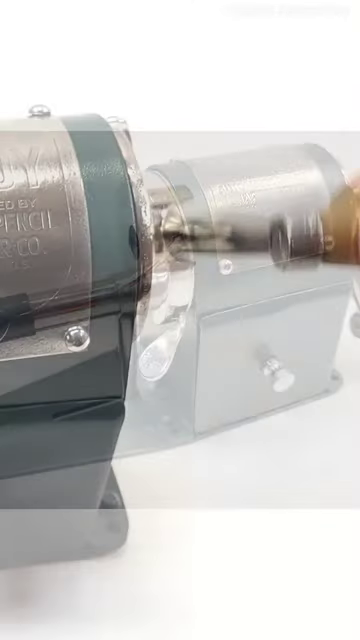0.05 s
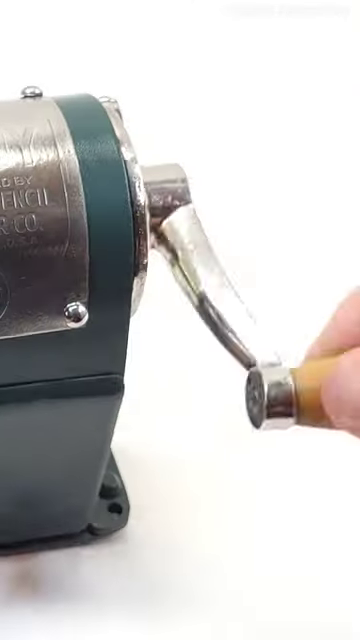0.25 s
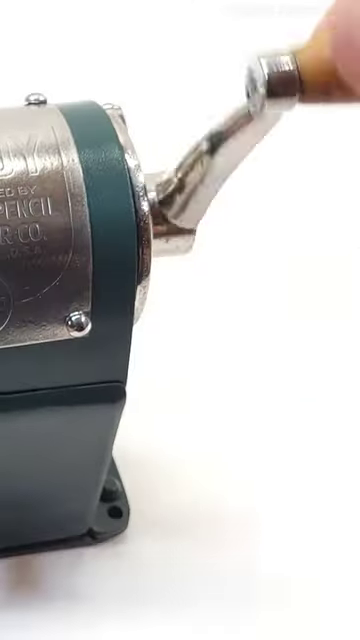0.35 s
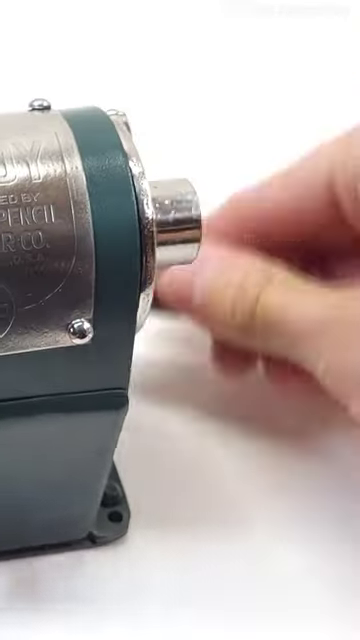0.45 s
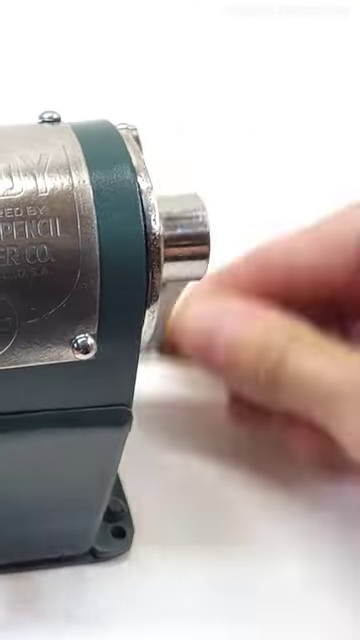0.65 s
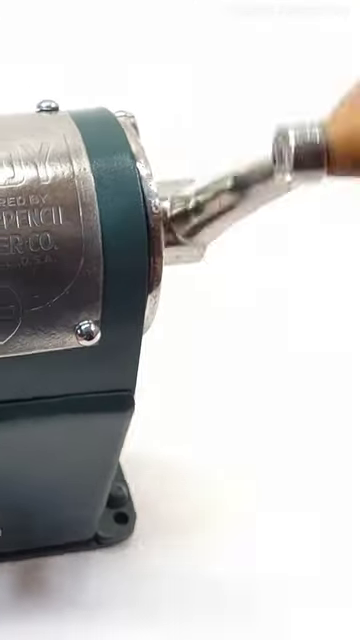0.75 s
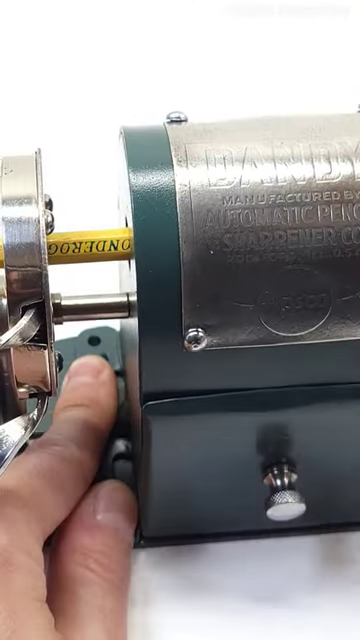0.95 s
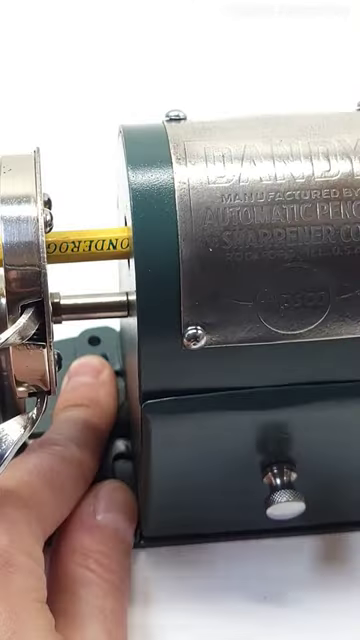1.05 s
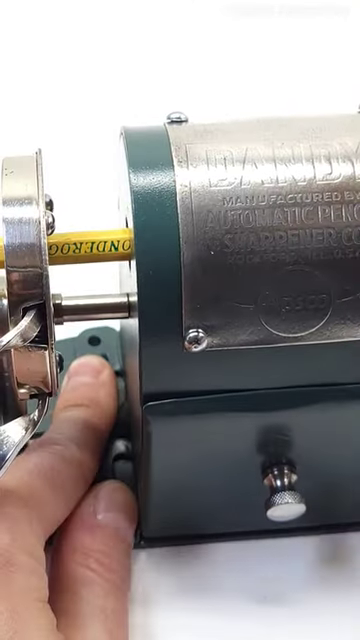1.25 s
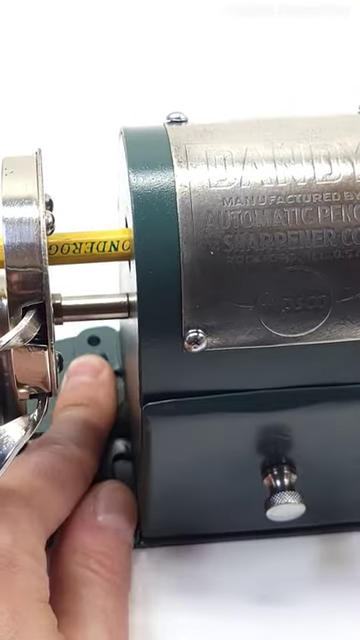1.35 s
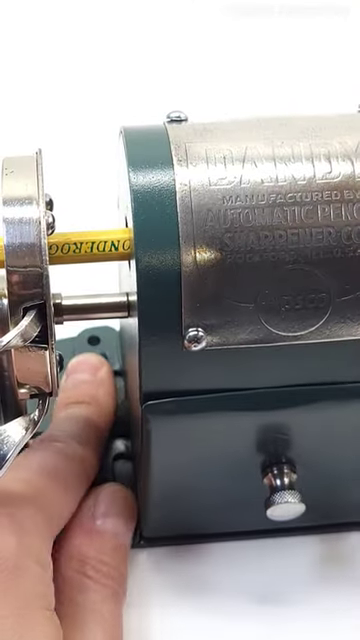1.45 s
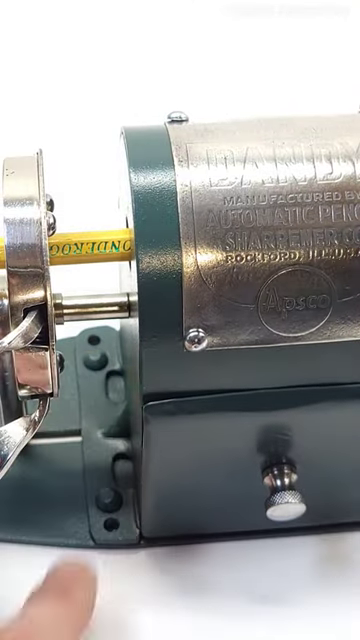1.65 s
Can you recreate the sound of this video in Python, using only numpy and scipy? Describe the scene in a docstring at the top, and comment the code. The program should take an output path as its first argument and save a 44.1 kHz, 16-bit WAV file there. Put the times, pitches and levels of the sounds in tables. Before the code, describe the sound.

A hand-cranked pencil sharpener starts lightly, then grinds steadily through wood with gear clicks and tiny squeaks while the table drones underneath. It stops with a small tick and a soft bump, close up in a small, dry room.

```python
"""A hand-cranked pencil sharpener on a table, close to the microphone in a small, dry room.
A light first stroke, then a second of steady cutting: the spiral cutters rasp and squeak through the
wood, biting deeper about twelve times a second, while gears and crank snap in their play. The metal
housing rings and the table top drones under it, heard first from the crank side, then from the front.
The crank stops with a small tick, and a soft bump follows over a faint hiss."""
import sys
import numpy as np
from scipy import signal
from scipy.fft import rfft, irfft
from scipy.io import wavfile
from scipy.ndimage import uniform_filter1d

SR = 44100
rng = np.random.default_rng(int(sys.argv[2]) if len(sys.argv) > 2 else 0)


def wav_record(signal):
    """Record a signal, one row per channel, as 16-bit PCM in the file named by sys.argv[1]."""
    frames = np.transpose(np.atleast_2d(signal))
    bounded = np.clip(frames, -1, 1)
    # unit amplitude maps onto the largest positive 16-bit level
    quanta = np.round(bounded * 32767).astype(np.int16)
    wavfile.write(sys.argv[1], SR, quanta)


N = 74970
T = np.arange(N) / SR

GRIND_DB, RASP_DB, SPLINTER_DB, DRONE_DB = -4, -9, -8, -3.5
BITE_RISE_S, BITE_FALL_S = 0.013, 0.013
# effort on the crank: t/s, relative grinding level/dB, relative drone level/dB
CRANK_EFFORT = [(.05, -105, -98), (.066, -58.5, -59), (.115, -48.5, -47), (.16, -40.5, -45.5),
                (.21, -38, -37), (.315, -38, -37.5), (.345, -52.5, -39.5), (.375, -41, -31.5),
                (.398, -57, -50), (.408, -42, -41), (.44, -39, -37), (.47, -25.5, -23), (.54, -30.5, -29),
                (.65, -29, -29), (.78, -27, -29.5), (.835, -32.5, -29.5), (.92, -29, -29),
                (1.02, -33.5, -34), (1.10, -31.5, -31), (1.17, -32.5, -36.5), (1.25, -32.5, -28.5),
                (1.365, -38, -35.5), (1.435, -39, -31.5), (1.462, -44, -36), (1.50, -79, -58.5),
                (1.58, -77, -57), (1.7, -78, -70)]
# the cutters bite deeper: t/s, extra level/dB
DEEP_BITES = [(0.226, 4), (0.3, 6.5), (.492, 1), (.60, 1), (0.688, 6.5), (.745, 1), (0.806, 7.5),
              (0.898, 5), (0.986, 6.5), (1.053, 7.5), (1.073, 4.5), (1.133, 3.5), (1.225, 4), (1.292, 2),
              (1.337, 7), (1.386, 10), (1.421, 8)]
# spectra of the low grind and the bright rasp: f/Hz, relative level/dB
GRIND_SPECTRUM = [(30, -50), (70, -37), (150, -35), (330, 5.5), (430, -4.5), (550, -11.5), (700, 2),
                  (900, -0.5), (1200, -1.5), (1450, 0.5), (2100, 0), (2700, -6.5), (4000, -18), (9000, -36)]
RASP_SPECTRUM = [(1200, -31), (2600, 0.5), (3400, -2.5), (5000, 2.5), (6500, -2.5), (8000, 3), (10000, 1.5),
                 (11000, -1.5), (12200, -2), (14000, -10), (15500, 3)]
def cutting():
    """Edges grind and rasp through the wood and shake the table: (sound of metal, sound of table)."""
    effort_db, table_db = in_time(CRANK_EFFORT)
    bite_db = np.zeros(N)
    for s, db in DEEP_BITES:
        width_s = np.where(T < s, BITE_RISE_S, BITE_FALL_S)
        bite_db += db * np.exp(-((T - s) / width_s) ** 2)
    force = teeth()
    grind = from_db(GRIND_DB) * evened(through(force * chips(), colour(GRIND_SPECTRUM)), window_s=0.02)
    scrape = from_db(RASP_DB) * through(chips(), colour(RASP_SPECTRUM))
    rasp = force * (scrape + from_db(SPLINTER_DB) * splinters())
    drone = from_db(DRONE_DB) * evened(table_top(force * chips()), window_s=0.043)
    metal = from_db(effort_db + bite_db) * (grind + rasp)
    table = from_db(table_db) * (from_db(bite_db) * drone + table_hum())
    return metal, table


def teeth(count=400, per_s=125, jitter=.3, spread_db=2.5, decay_s=0.0045, steady_force=0.85):
    """Cutting edges meet the wood in an uneven run; each gives a short surge of force."""
    timing, strength = rng.standard_normal((count, 2)).T
    at = (np.cumsum(np.exp(jitter * timing)) / per_s * SR).astype(int)
    hits = np.zeros(N)
    hits[at[at < N]] = from_db(spread_db * strength[at < N])
    return evened(steady_force + through(hits, np.exp(-T / decay_s)), window_s=0.074)


def chips(per_s=7000, spread_db=2.5):
    """Dense tiny fractures of uneven size; rms one."""
    sizes = from_db(spread_db * np.minimum(rng.exponential(1, N), 4)) * rng.choice([-1, 1], N)
    breaks = rng.random(N) < per_s / SR
    return unit(sizes * breaks) * np.sqrt(N)


def splinters(count=28, per_s=1800, spread_db=2, t60_s=0.0092, low_hz=3240, high_hz=14370):
    """Fibres tear off one by one, each with a brief ring at one of many pitches; rms one."""
    sizes = from_db(spread_db * np.minimum(rng.exponential(1, N), 3)) * rng.choice([-1, 1], N)
    tears = sizes * (rng.random(N) < per_s / SR)
    pitch_index = rng.integers(0, count, N)
    radius = from_db(-60 / (t60_s * SR))
    out = np.zeros(N)
    for k, hz in enumerate(np.linspace(low_hz, high_hz, count)):
        gain = from_db(np.interp(hz, *np.transpose(RASP_SPECTRUM)))
        out += gain * resonate(tears * (pitch_index == k) + 1e-18, hz, radius)
    return unit(out) * np.sqrt(N)


CRACK_DB, CLANK_DB, THUMP_DB = 6, -3, 19.5
# gears and crank snap in their play: t/s, relative level/dB of crack, housing clank and table thump
GEAR_SNAPS = [(0.1102, -44, -38.5, -54), (0.139, -39, -60, -55), (0.17, -30.5, -46, -52),
              (0.193, -43, -38, -40), (.294, -42, -33, -42), (0.315, -41, -30, -33),
              (.414, -30.5, -40, -40), (.419, -32.5, -33, -34), (0.4653, -22, -23, -27),
              (0.476, -18.5, -29, -19), (.567, -32, -28, -26.5), (0.6165, -23.5, -33, -30),
              (0.6462, -25.5, -35, -38), (0.7356, -13.5, -20.5, -39), (0.7406, -21, -19, -29),
              (.8008, -15, -22, -38), (0.8152, -24, -47, -20.5), (.849, -14, -20.5, -48),
              (.853, -28, -15.5, -20), (0.857, -26, -32, -11.5), (0.9707, -23.5, -31, -46),
              (0.979, -22, -30, -38), (.985, -18.5, -26, -21), (1.0405, -35, -24, -34),
              (1.0681, -23, -25.5, -17), (1.088, -32, -42, -37), (1.1155, -31, -24, -37),
              (1.130, -21, -33, -18.5), (1.136, -23, -47, -23), (1.22, -20.5, -26.5, -22),
              (1.279, -27, -50, -44), (1.293, -21, -24, -38), (1.3237, -23, -31, -47),
              (1.3892, -21, -23.5, -20), (1.405, -34, -25.5, -26)]
# spectrum of the bright crack: f/Hz, relative level/dB
CRACK_SPECTRUM = [(900, -30), (2000, -19), (3300, -3.5), (5500, 1), (7500, 0), (10000, 0), (12500, -7),
                  (15500, -21)]
def snaps(crack_rise_s=.0011, crack_fall_s=0.002, clank_fall_s=0.0052, push_s=0.00068):
    """Each snap is a burst of hard contacts and a push on the table: (sound of metal, sound of table)."""
    s, crack_db, clank_db, thump_db = np.transpose(GEAR_SNAPS)
    burst = rise_and_fall(crack_rise_s, crack_fall_s)   # a crack builds over several contacts
    crack_level = through(strikes(s, crack_db + CRACK_DB), burst)
    crack = crack_level * evened(noise(CRACK_SPECTRUM), window_s=0.0012)
    clank_level = through(strikes(s, clank_db + CLANK_DB), np.exp(-T / clank_fall_s))
    clank = clank_level * evened(through(chips(), colour(GRIND_SPECTRUM)), window_s=0.0013)
    push = np.sin(np.pi * np.minimum(T / push_s, 1))
    thump = through(strikes(s, thump_db + THUMP_DB), push / push.sum())
    return crack + clank, table_top(thump)


# the cutters squeak on the wood: middle t/s, half length/s, f/Hz, level/dB
CUTTER_SQUEAKS = [(0.222, 0.016, 7650, -44.5), (.272, 0.0097, 7300, -44.5), (.494, 0.0052, 8100, -37),
                  (0.514, 0.0072, 7800, -34), (0.564, 0.015, 7440, -35), (0.593, 0.0048, 15400, -33.5),
                  (0.775, 0.014, 7900, -33.5), (.779, 0.0054, 14900, -32.5), (0.852, 0.004, 7600, -26),
                  (1.042, 0.006, 8800, -35), (1.126, 0.016, 8740, -34.5), (1.19, 0.014, 8600, -42),
                  (1.27, 0.013, 9150, -36), (1.347, 0.0094, 8950, -45), (1.442, 0.012, 8950, -49)]
def squeaks(width_hz=480):
    """An edge sticks and slips on the wood for a moment: a short, unsteady high tone."""
    radius = np.exp(-np.pi * width_hz / SR)
    out = np.zeros(N)
    for s, half_s, hz, db in CUTTER_SQUEAKS:
        tone = evened(resonate(rng.standard_normal(N), hz, radius), window_s=0.0067)
        out += from_db(db) * np.exp(-.5 * ((T - s) / half_s) ** 2) * tone
    return out


# modes of the metal shell: f/Hz, relative level/dB at the crank side and at the front, t60/s
HOUSING_MODES = [(643, 1, 2, 0.06), (787.4, -2.5, 1.5, 0.11), (892.6, 4, -6.5, 0.077), (964, 0.5, 6, 0.04),
                 (1108, 7, -13, 0.06), (1228, -8.5, 8.5, 0.049), (1374, -6, -18, 0.031),
                 (1550, -5.5, -13.5, 0.045), (1780, -4.5, -9.5, 0.13), (1865, -6, -15, 0.024),
                 (2110, -15, 4, 0.045), (4100, 6.5, 6, .014), (5020, 2, -5.5, 0.031),
                 (5930, 11, -19.5, 0.016), (6400, 6, 12, .016), (7150, 15.5, -3, 0.013),
                 (8190, 12.5, -0.5, 0.013), (9100, 8, -15, .02)]
def housing(contacts, direct_db=47.5):
    """Contacts reach the microphone directly and through the ring of the metal shell."""
    return ringing(contacts, HOUSING_MODES, direct=from_db(direct_db))


# modes of the table top: f/Hz, relative level/dB at the crank side and at the front, t60/s
BOARD_MODES = [(165, -9, -38.5, 0.023), (208.6, 1.5, -13, 0.15), (230.3, -1, -0.5, 0.15),
               (253, -9, 0.5, .11), (294, -15, -5, 0.15), (341.7, -7, -3.5, 0.14), (395.3, -14, -6.5, 0.13)]
def table_top(force, low_hz=134, high_hz=489):
    """The board under the sharpener rings in its low modes and radiates neither deep bass nor treble."""
    band = signal.butter(2, [low_hz, high_hz], "band", fs=SR, output="sos")
    bass_cut = signal.butter(2, low_hz, "high", fs=SR, output="sos")
    return signal.sosfilt(np.vstack([band, bass_cut]), ringing(force, BOARD_MODES, direct=0.))


def table_hum(hz=93.2, t60_s=0.34, relative_db=-22, front_db=-4.5):
    """The turning crank keeps the table's lowest mode humming; it is weaker from the front."""
    mode = from_db(-60 * T / t60_s) * np.sin(2 * np.pi * hz * T)
    just_above_mode = signal.butter(2, [hz * 1.06, hz * 1.28], "band", fs=SR, output="sos")
    shake = signal.sosfilt(just_above_mode, chips())
    return from_db(relative_db + front_db * front_share()) * evened(through(shake, mode), window_s=0.071)


# the mechanism settles: t/s, clack level/dB, tick level/dB
SETTLING_TICKS = [(1.494, -57, -53), (1.5199, -39.5, -40.5), (1.531, -48, -38.5)]
# spectra of the clack and the bright tick: f/Hz, relative level/dB
CLACK_SPECTRUM = [(130, -18), (300, 3.5), (430, 1), (600, -10), (950, -7), (1230, 6), (1650, -2.5),
                  (2300, -1), (3000, -18), (4200, -13), (5600, -28), (9000, -23)]
TICK_SPECTRUM = [(2000, -24), (4200, -12), (5700, -23), (6500, -11), (8000, -18), (9600, -4), (10600, 6),
                 (11500, -7), (15000, -19)]
def ticks(clack_s=0.0068, tick_s=0.0017):
    """Loose parts drop into rest with a small clack and bright ticks."""
    s, clack_db, tick_db = np.transpose(SETTLING_TICKS)
    out = np.zeros(N)
    for db, decay_s, spectrum in (clack_db, clack_s, CLACK_SPECTRUM), (tick_db, tick_s, TICK_SPECTRUM):
        level = through(strikes(s, db), np.exp(-T / decay_s))
        out += through(level * rng.standard_normal(N), colour(spectrum))
    return out


# soft bumps on the table: t/s, relative level/dB
TABLE_BUMPS = [(1.63, -24), (1.658, -33)]
# spectrum of a bump: f/Hz, relative level/dB
BUMP_SPECTRUM = [(25, -45), (60, -33), (110, -14), (190, 9), (280, 5.5), (430, -2), (800, -11.5),
                 (1300, -25), (2000, -38), (6000, -41.5), (10500, -35.5), (15000, -46)]
def bumps(rise_s=0.009, fall_s=0.0097):
    """Dull, soft knocks on the table once the crank is still."""
    swell = through(strikes(*np.transpose(TABLE_BUMPS)), rise_and_fall(rise_s, fall_s))
    return swell * evened(noise(BUMP_SPECTRUM), window_s=0.0113)


def room(x, t60_s=0.091, tail_db=-10.5, delay_s=0.0021):
    """At close range the direct sound leads; the small, dry room adds a short diffuse tail."""
    tail = rng.standard_normal(N) * from_db(-60 * T / t60_s) * (T > delay_s)
    return x + from_db(tail_db) * through(x, unit(tail))


# course of the background hiss: t/s, level/dB
HISS_COURSE = [(0, -100), (.05, -93), (.07, -78), (1.62, -79), (1.635, -73), (1.7, -60)]
# spectrum of the hiss: f/Hz, relative level/dB
HISS_SPECTRUM = [(30, 19.5), (100, 11), (300, 29), (1000, 0), (4000, -8), (7000, -10), (10500, 9.5),
                 (15000, 9.5)]
def hiss():
    """Faint noise behind the sharpener, rising at the very end."""
    return from_db(in_time(HISS_COURSE)[0]) * noise(HISS_SPECTRUM)


def front_share(middle_s=.885, fade_s=.03):
    """How far the microphone has moved from the crank side (0) to the front (1)."""
    return np.clip((T - middle_s) / fade_s + .5, 0, 1)


def ringing(x, modes, direct, size=12000):
    """A body answers with a direct share and dying modes, balanced differently on its two sides."""
    t = T[:size]
    crank, front = direct * (t == 0), direct * (t == 0)
    for hz, crank_db, front_db, t60_s in modes:
        mode = from_db(-60 * t / t60_s) * np.cos(2 * np.pi * hz * t)
        crank += from_db(crank_db) * mode
        front += from_db(front_db) * mode
    share = front_share()
    return through(x * (1 - share), unit(crank)) + through(x * share, unit(front))


def resonate(x, hz, radius):
    """One resonance; the nearer its pole radius is to one, the longer it rings."""
    return signal.lfilter([1, 0, -1], [1, -2 * radius * np.cos(2 * np.pi * hz / SR), radius ** 2], x)


def colour(spectrum, size=4096):
    """Causal response with the given spectrum and an energy of one."""
    hz, db = np.transpose(spectrum)
    grid_hz = np.maximum(np.arange(size // 2 + 1) * SR / size, 1)
    gain = from_db(np.interp(np.log(grid_hz), np.log(hz), db))
    cepstrum = irfft(np.log(gain))
    cepstrum[1:size // 2] *= 2   # fold onto positive time for minimum phase
    cepstrum[size // 2 + 1:] = 0
    return unit(irfft(np.exp(rfft(cepstrum))))


def noise(spectrum):
    """Steady noise with the given spectrum."""
    return through(rng.standard_normal(N), colour(spectrum))


def strikes(s, db):
    """One impulse for each event."""
    out = np.zeros(N)
    out[(s * SR).astype(int)] = from_db(db)
    return out


def rise_and_fall(rise_s, fall_s):
    """An envelope that builds and dies away."""
    return (1 - np.exp(-T / rise_s)) * np.exp(-T / fall_s)


def evened(x, window_s):
    """Hold a signal's running level at one."""
    power = uniform_filter1d(x ** 2, int(window_s * SR) + 1)
    return x / np.sqrt(np.maximum(power, 1e-12))


def through(x, response):
    """Play a signal through a response."""
    return signal.fftconvolve(x, response)[:N]


def in_time(rows):
    """Each column of a curve, at every sample."""
    s, *columns = np.transpose(rows)
    return [np.interp(T, s, column) for column in columns]


def unit(x):
    """Scale to an energy of one."""
    return x / np.sqrt(np.sum(x ** 2) + 1e-20)


def from_db(db):
    """Decibels to gain."""
    return 10 ** (np.asarray(db) / 20)


def scene():
    """At one close microphone: the sharpener in its room, the table under it, faint hiss behind."""
    cut_metal, cut_table = cutting()
    snap_metal, snap_table = snaps()
    background = hiss()
    sharpener = housing(cut_metal + snap_metal) + squeaks() + ticks()
    return (room(sharpener) + cut_table + snap_table + bumps() + background)[None]


def record(dry):
    """The microphone signal loses its highest treble in a steep cut."""
    cutoff_hz = 15450
    return signal.sosfilt(signal.ellip(12, .2, 80, cutoff_hz, fs=SR, output="sos"), dry)


dry = scene()
out = record(dry)
wav_record(out)
```